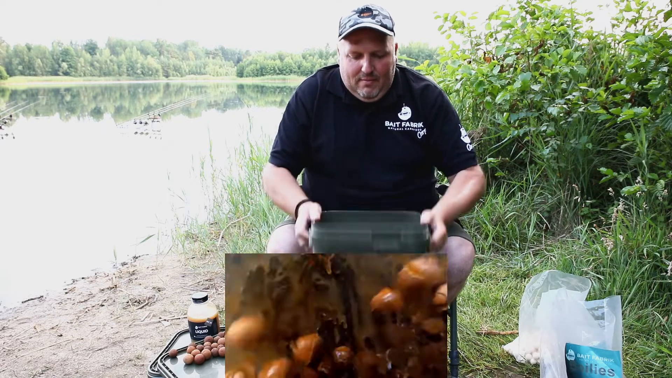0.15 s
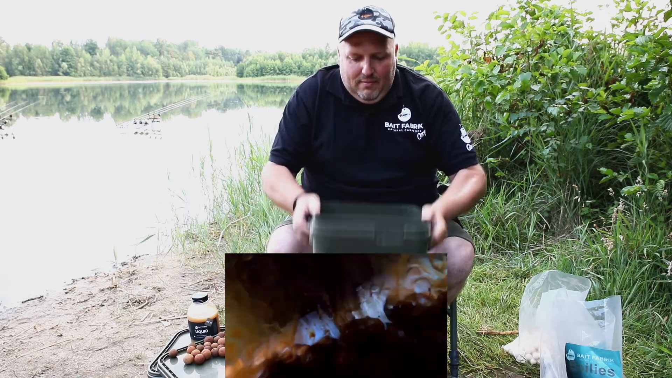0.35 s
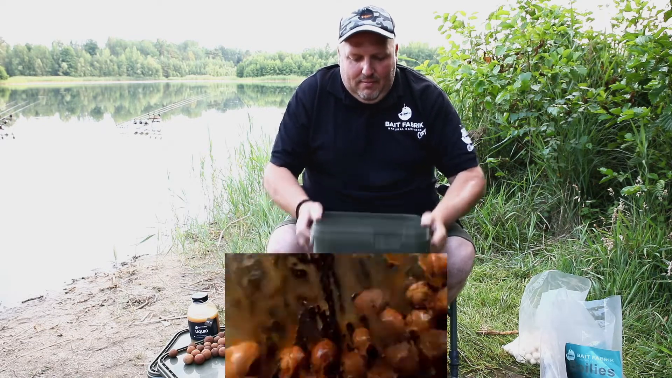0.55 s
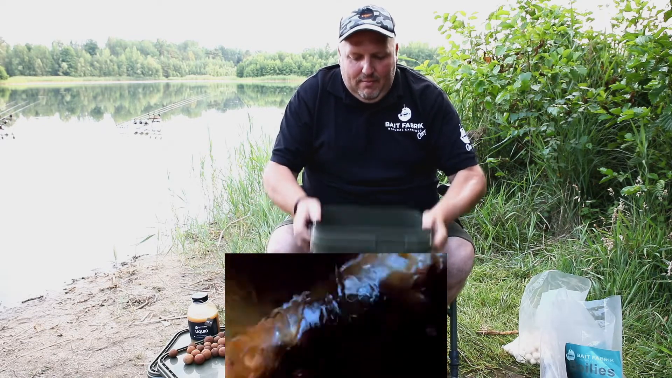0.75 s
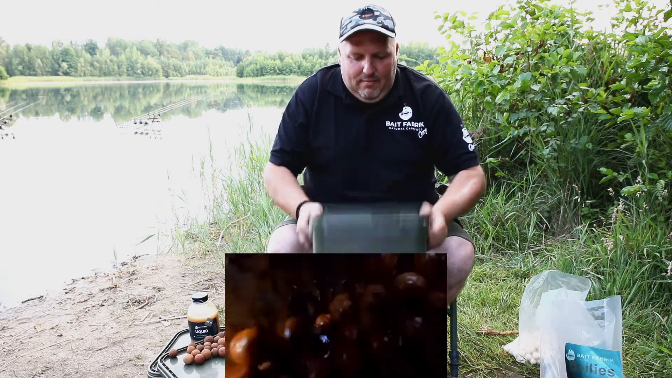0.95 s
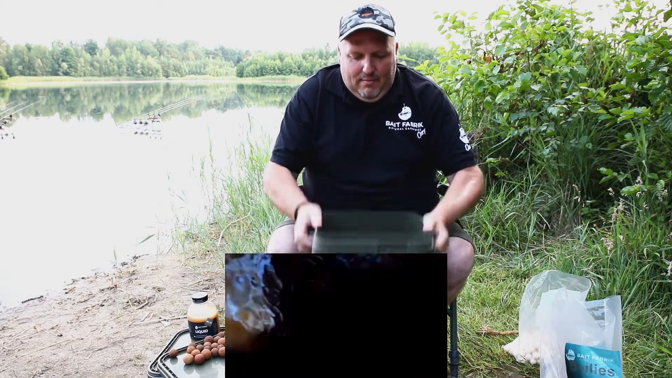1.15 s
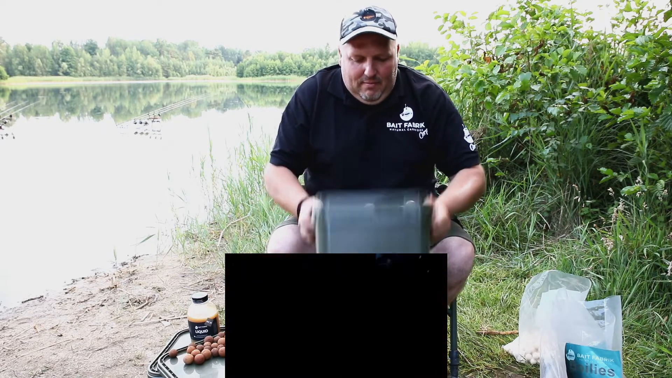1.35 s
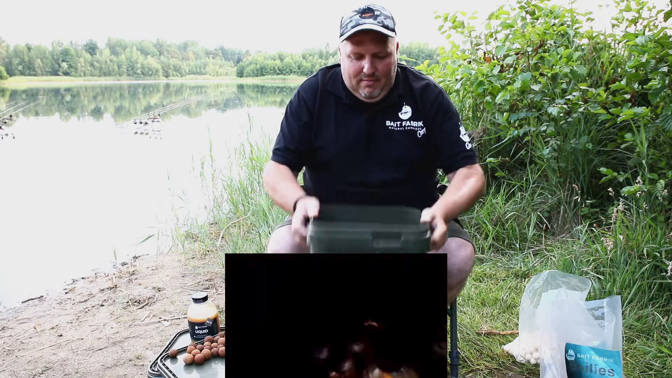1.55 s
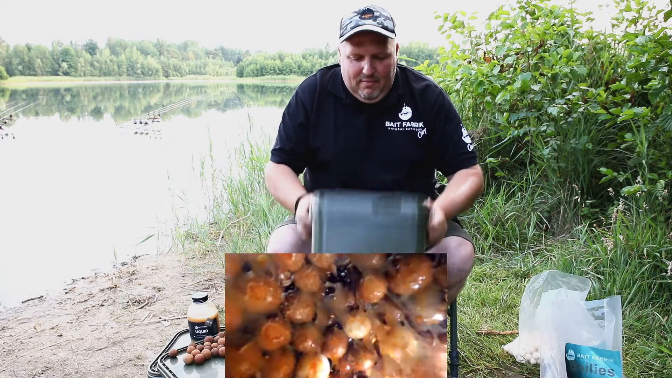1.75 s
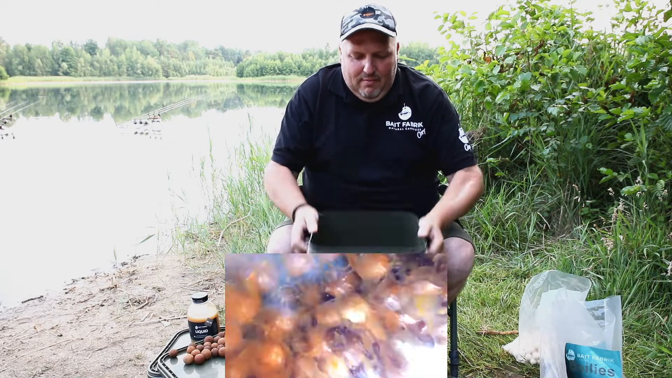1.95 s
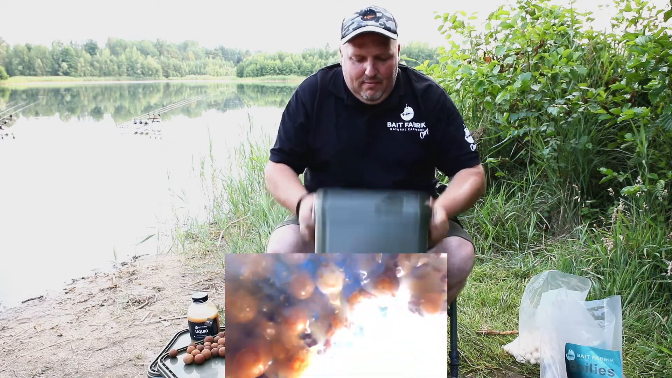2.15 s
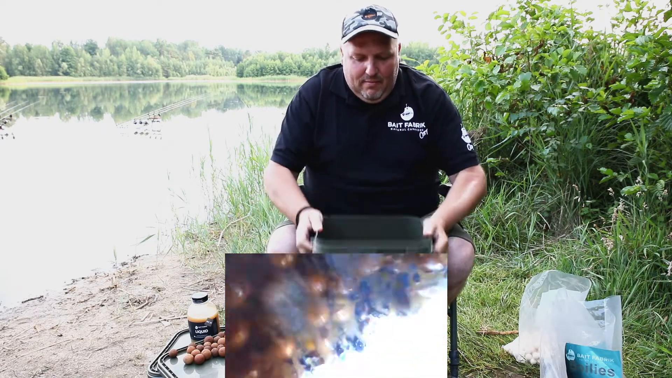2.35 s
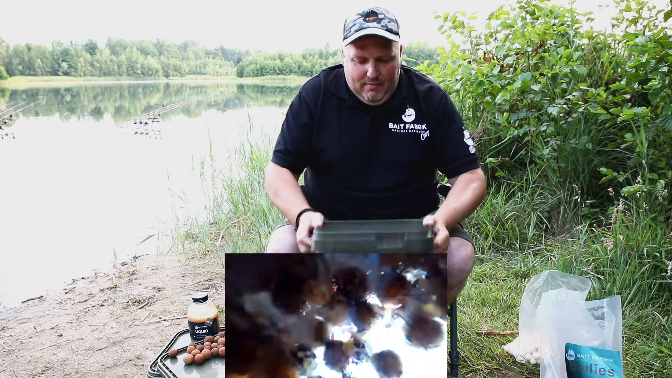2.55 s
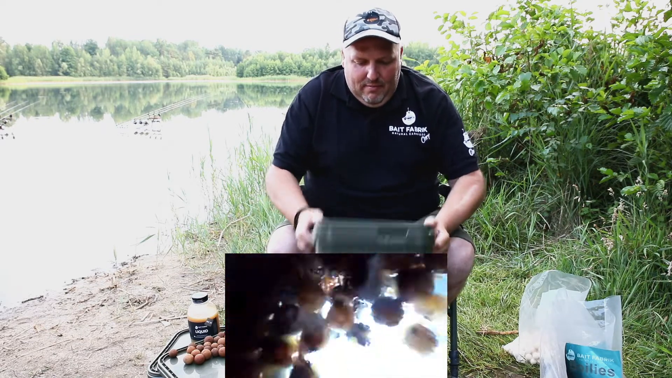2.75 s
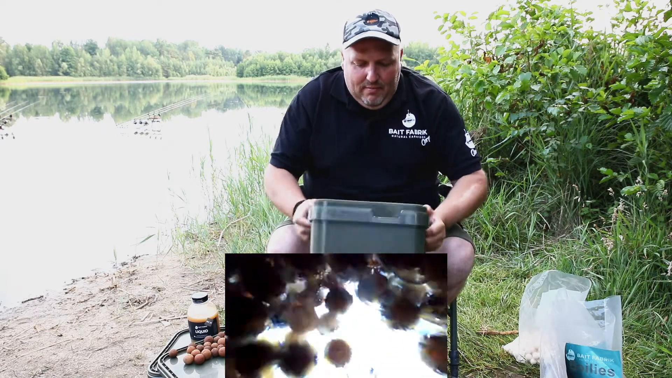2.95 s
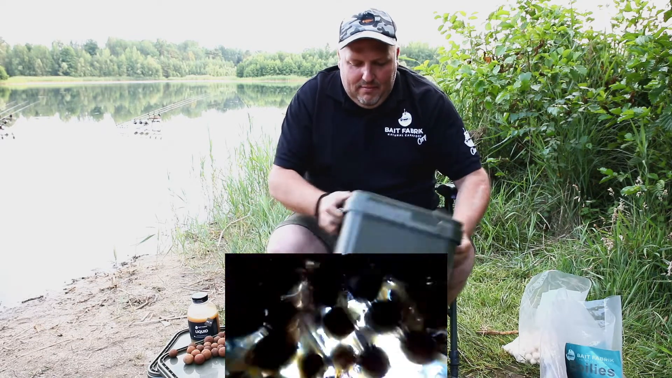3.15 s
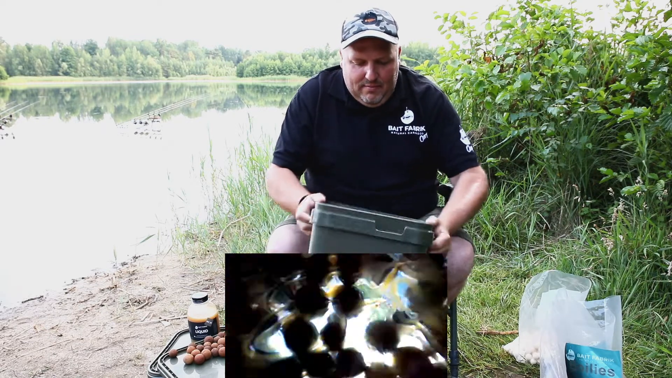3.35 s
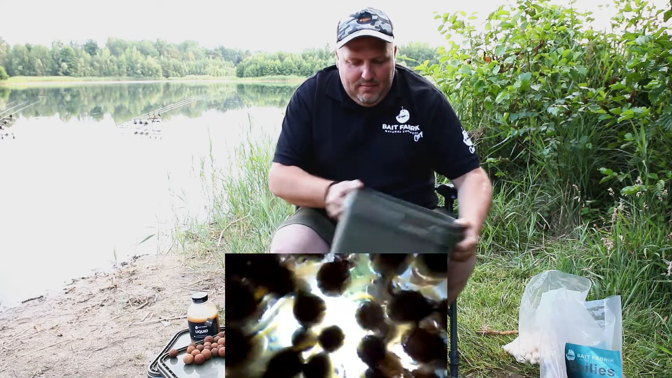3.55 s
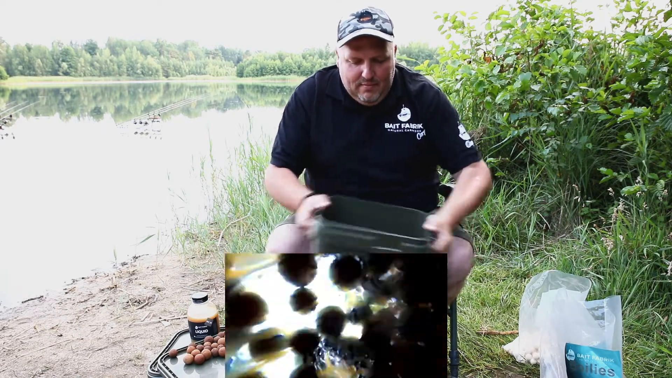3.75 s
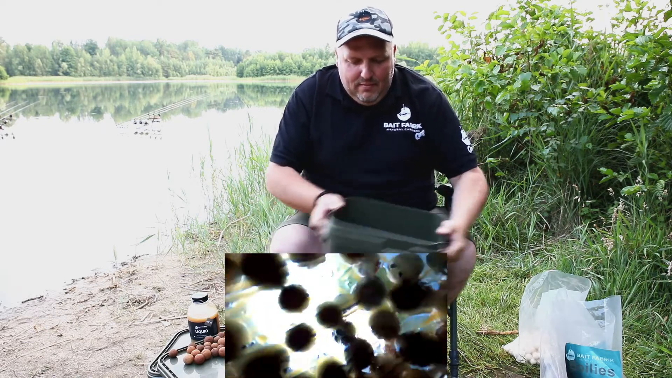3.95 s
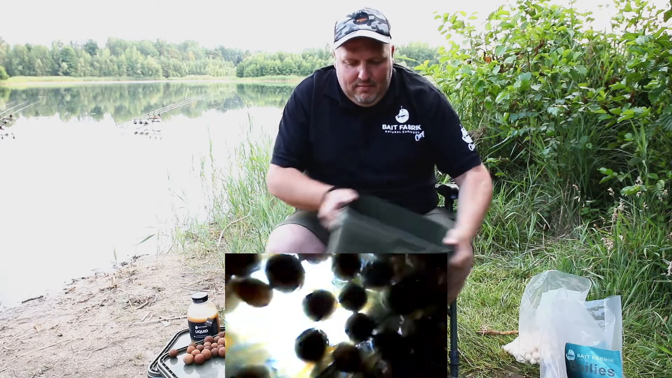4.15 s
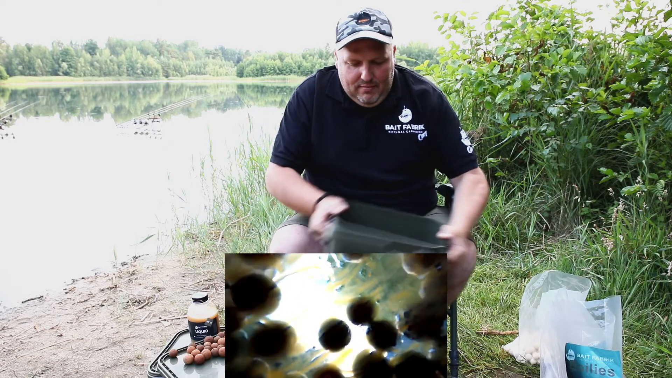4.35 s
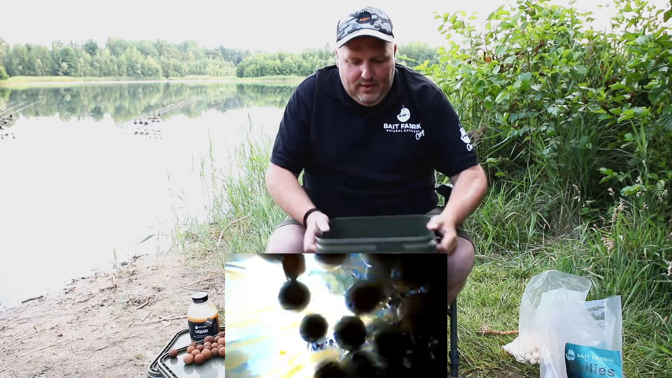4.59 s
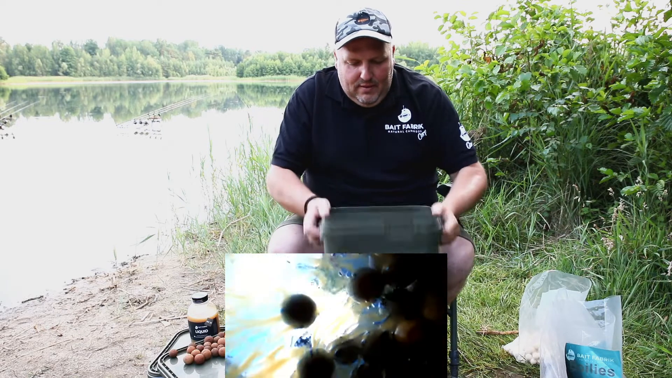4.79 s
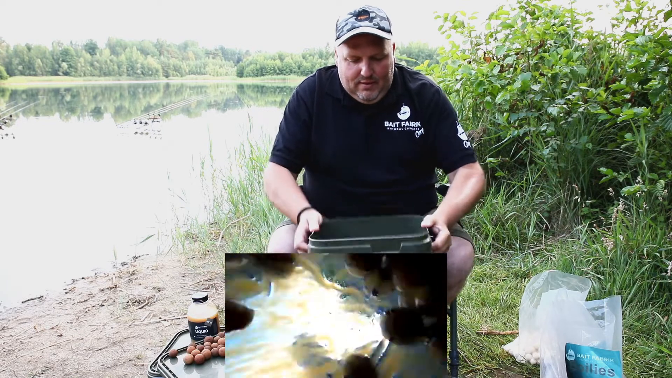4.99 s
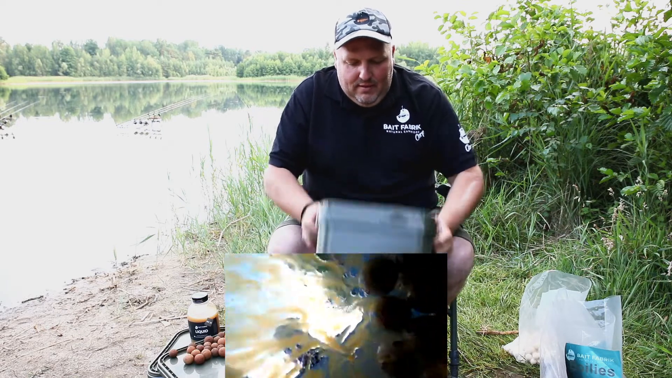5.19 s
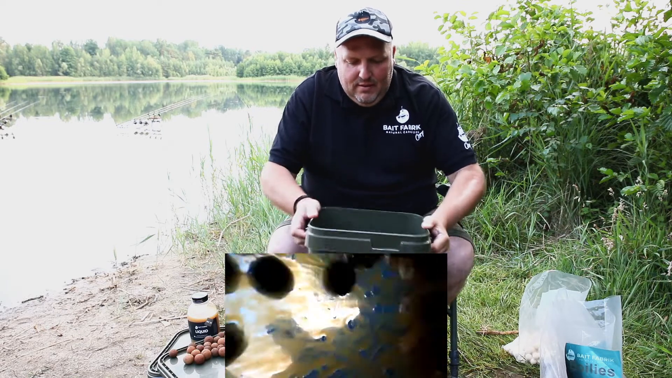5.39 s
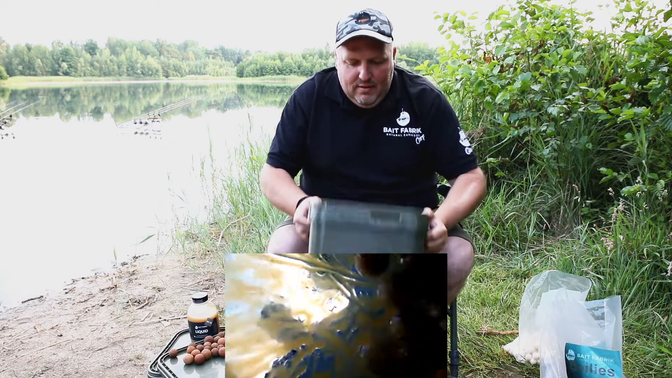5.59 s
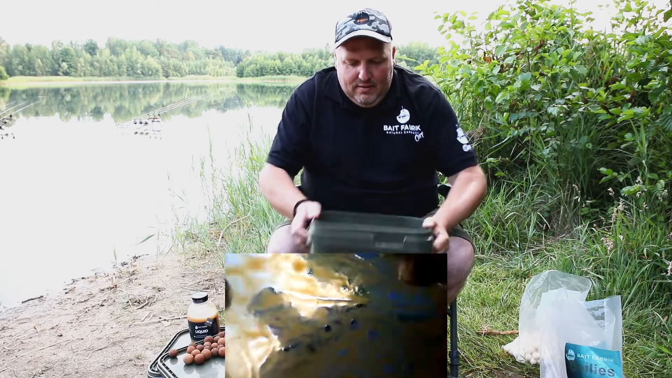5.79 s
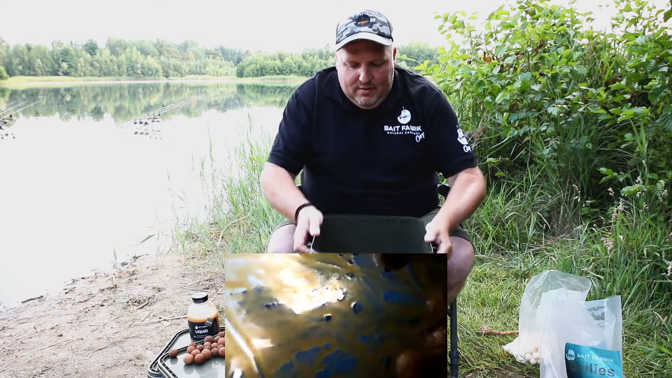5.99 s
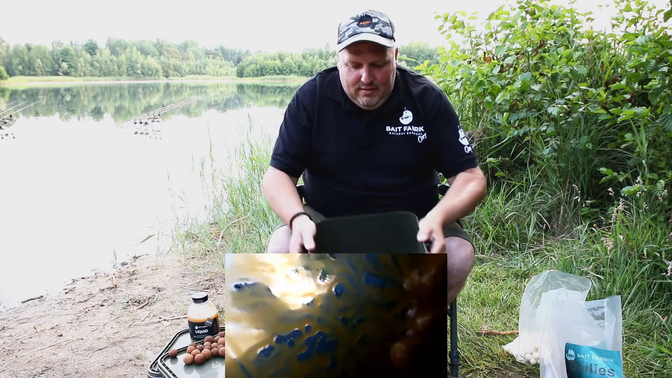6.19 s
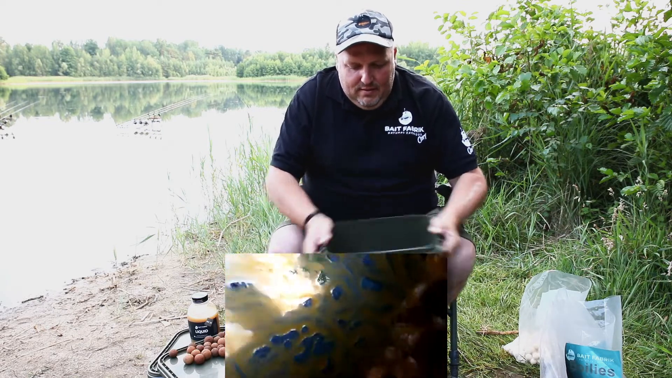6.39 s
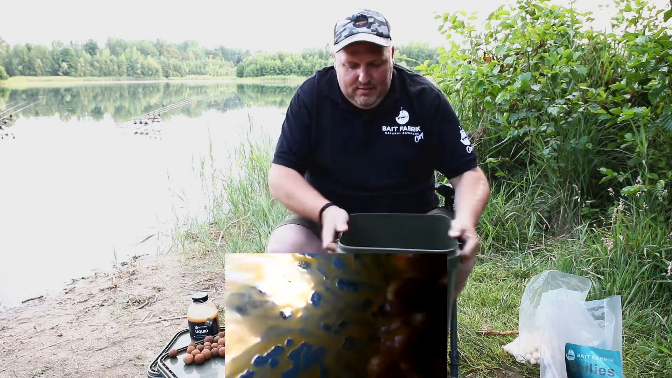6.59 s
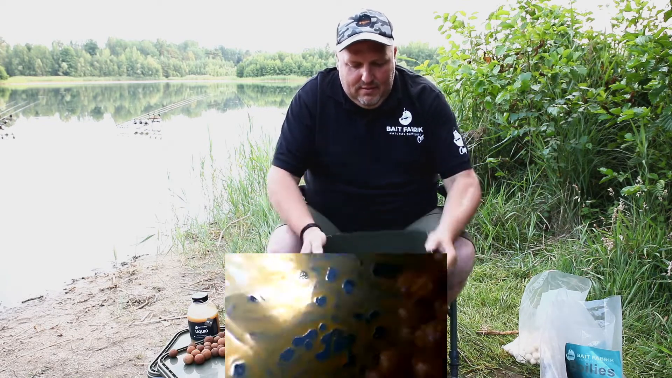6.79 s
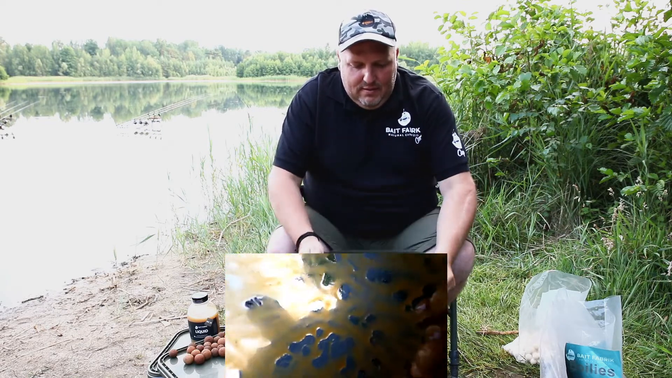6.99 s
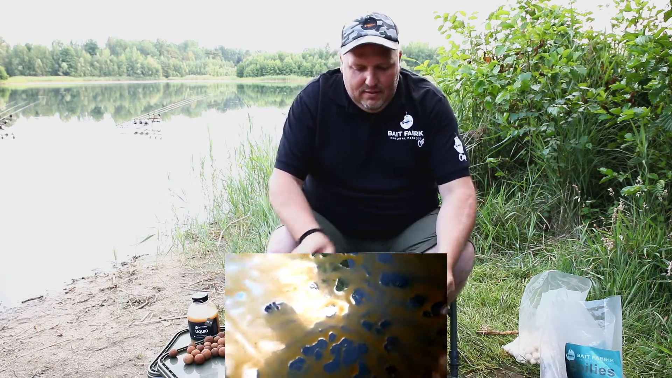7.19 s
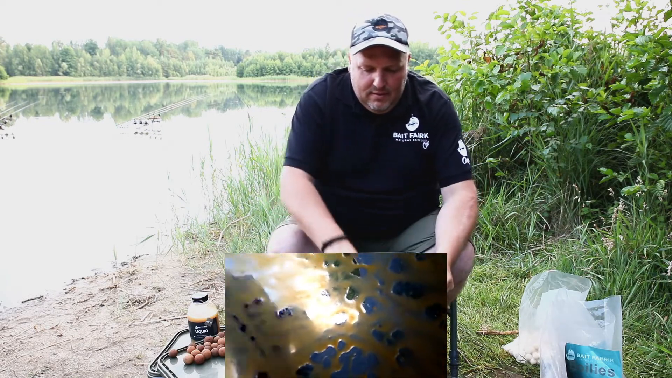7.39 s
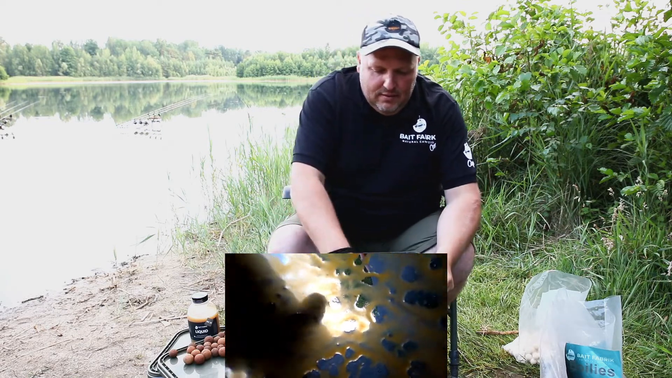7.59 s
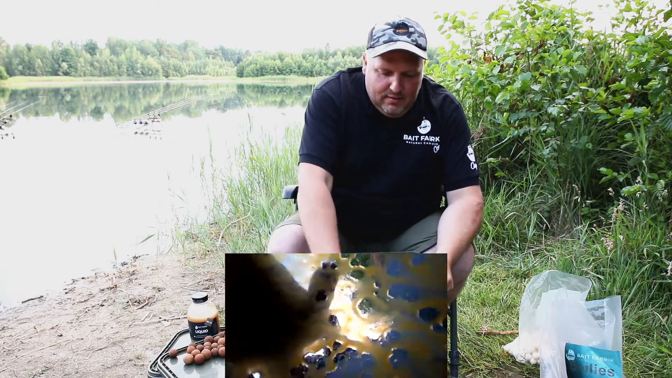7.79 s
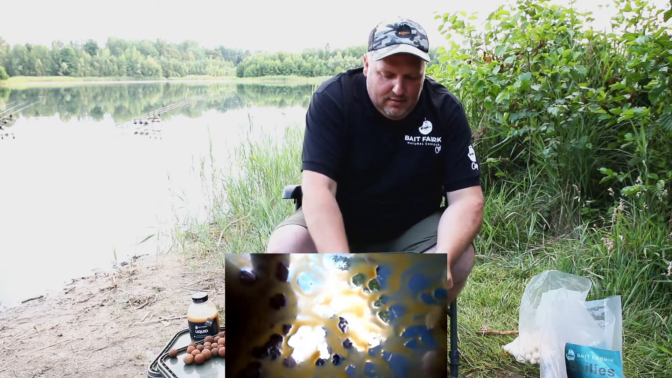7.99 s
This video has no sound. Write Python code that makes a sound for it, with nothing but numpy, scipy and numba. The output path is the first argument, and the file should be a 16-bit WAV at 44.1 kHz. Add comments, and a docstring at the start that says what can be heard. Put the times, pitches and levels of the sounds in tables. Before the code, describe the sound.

Hard balls are tossed and swirled in a plastic bucket with hollow knocks and bright clacks, thinning out near the end.

```python
"""Hard round baits tumble in a plastic bucket, tossed and swirled by a lake and heard from inside it.
Each impact excites the damped modes of the walls and floor, a short hollow ring; some contacts clack
brightly, and the rolling mass fills the gaps with small blows and a rustle. Near the end the bucket
is set down. Beneath lie quiet outdoor air, a low wavering drone, a thin whine and one far bird."""
import sys
import numpy as np
from scipy import signal
from scipy.fft import rfft, irfft
from scipy.io import wavfile
from scipy.ndimage import uniform_filter1d
from numba import njit

SR = 44100
rng = np.random.default_rng(int(sys.argv[2]) if len(sys.argv) > 2 else 0)


def master(y):
    """Save y as 16-bit WAV."""
    cut = np.clip(np.atleast_2d(y).T, -1, 1)
    pcm = np.round(cut * 32767)  # scale
    wavfile.write(sys.argv[1], SR, pcm.astype(np.int16))


N = 354387


def undb(db):
    """Amplitude ratio of a level in decibels."""
    return 10 ** (np.asarray(db) / 20)

def poles(hz, t60):
    """Damped oscillation: the turn and decay of each mode over one sample."""
    return np.exp(2j * np.pi * hz / SR - np.log(1000) / (np.clip(t60, .004, .5) * SR))

def swell(seconds):
    """Exponential relaxation: the per-sample factor for an onset's time constant."""
    return np.exp(-1 / (np.clip(np.atleast_1d(seconds), 1e-5, 1) * SR))

@njit
def ring(start, pole, gain, rise):
    """Modal superposition: each mode swells while the contact lasts, then decays freely."""
    out = np.zeros(N)
    for blow in range(len(start)):
        for mode in range(pole.shape[1]):
            phasor, step, lag = gain[blow, mode], pole[blow, mode], 1.
            end = min(N, start[blow] + int(-6 / np.log(abs(step))))
            for i in range(start[blow], end):
                out[i] += phasor.imag * (1 - lag) ** 2
                phasor *= step
                lag *= rise[mode]
    return out

def bursts(start_s, db, t60, rise_s):
    """Incoherent addition: the envelope of decaying noise bursts, summed by power."""
    power = undb(2 * db)[:, None] * 1j
    decay = np.abs(poles(0, np.full((len(start_s), 1), t60 / 2))) + 0j
    return np.sqrt(ring((start_s * SR).astype(np.int64), decay, power, swell(rise_s)))

def coloured(spectrum):
    """Spectral shaping: white noise filtered to the given spectrum, at unit rms."""
    hz, db = np.transpose(spectrum)
    bin_hz = np.arange(N // 2 + 1) * SR / N + 1
    gain = undb(np.interp(np.log(bin_hz), np.log(hz), db))
    noise = irfft(rfft(rng.standard_normal(N)) * gain, N)
    return noise / noise.std()

def waver(rate_hz):
    """Random modulation: straight glides between Gaussian values."""
    span = int(SR / rate_hz)
    return uniform_filter1d(np.repeat(rng.standard_normal(N // span + 1), span), span)[:N]


# Spectrum of the outdoor air: frequency_hz, density_db
AIR_SPECTRUM = [(18, -47), (30, 6), (95, -3.5), (203, 8.5), (411, -36.5), (975, -45.5), (1140, -7),
                (1480, -11.5), (2310, -13.5), (5630, -32), (8560, -31.5), (10300, -26), (15600, -32)]

def air():
    """Modulated noise and tone: a hush whose low peaks form a drone, and a thin high whine."""
    whine_level = np.sqrt(2) * undb(-77.5 + 2.5 * waver(22))
    whine_hz = 9992 + 4.0 * waver(6)
    whine = whine_level * np.sin(2 * np.pi * np.cumsum(whine_hz) / SR)
    return coloured(AIR_SPECTRUM) * undb(-53.5 + .6 * waver(3.9)) + whine


# A far bird's call: end_s, negative_length_s, final_hz, initial_hz, level_db
BIRD_CALL = (7.6, -0.3, 1920.5, 1700, -58)

def bird():
    """Linear frequency sweep: one faint rising whistle."""
    end_s, negative_length_s, final_hz, initial_hz, db = BIRD_CALL
    remaining = np.clip((np.arange(N) / SR - end_s) / negative_length_s, 0, 1)
    pitch_hz = final_hz + (initial_hz - final_hz) * remaining
    return undb(db) * np.sin(np.pi * remaining) * np.sin(2 * np.pi * np.cumsum(pitch_hz) / SR)


# Contacts of the base with the ground: start_s, level_db
GROUND_CONTACTS = [(7.002, -20.5), (7.021, -22), (7.038, -37)]
# Modes of the loaded base: pitch_hz, level_db, t60_s
BASE_MODES = [(109, -3.5, 0.049), (159, -3, 0.079), (218.5, 2, 0.13), (263, -18, 0.13)]

def set_down():
    """Impact excitation: the low modes of the loaded base thud as it rocks on the ground."""
    start_s, db = np.transpose(GROUND_CONTACTS)
    hz, mode_db, t60 = np.transpose(BASE_MODES)
    gain = undb(db[:, None] + mode_db - 2.5) + 0j
    modes = np.tile(poles(hz, t60), (len(start_s), 1))
    return ring((start_s * SR).astype(np.int64), modes, gain, swell(0.095 / hz))


# Modes of the walls and floor: pitch_hz, level_db, t60_s
BUCKET_MODES = [(90.5, -9.5, 0.068), (143, -17.5, 0.068), (183.7, -7, 0.079), (258.6, -8.5, 0.14),
                (291.3, 1.5, 0.11), (341.5, -8.5, 0.13), (417.9, -5, 0.098), (492.2, -6.5, 0.064),
                (545.7, -1, 0.056), (641, -2.5, 0.067), (764, 1, 0.03), (941, 3, 0.029),
                (1011.6, 1.5, 0.034), (1247, 4, 0.019), (1487, 2.5, 0.039), (1745, 1, 0.026),
                (2076, -3.5, 0.047), (2413, 0.5, 0.027), (2910, -8.5, 0.034), (3280, -23, 0.09),
                (3940, -24.5, 0.11), (4620, -18.5, 0.023)]
# Centres of a blow's five bands (thud, floor, body, wall, contact): frequency_hz
BANDS_HZ = (180, 280, 550, 1050, 2200)
# Spectrum of hard contact noise: frequency_hz, density_db
CRACK_SPECTRUM = [(1500, -0.5), (3000, 9.5), (5000, -6), (7000, -0.5), (8500, -4.5), (10000, 0),
                  (12500, -9), (15700, -23)]

def bucket_blows(start_s, band_db, spot_db, detune, rise_cycles, crack_db, sign_bias):
    """Modal response: the spot struck sets each mode's share; the load shifts its pitch at random."""
    hz, db, t60 = np.transpose(BUCKET_MODES)
    spot, side, load = rng.standard_normal((len(start_s), 3, len(hz))).transpose(1, 0, 2)
    drive_db = np.array([np.interp(np.log(hz), np.log(BANDS_HZ), row) for row in band_db])
    polarity = np.sign(side - sign_bias)  # most modes start the same way: a spike
    gain = undb(drive_db + db + spot_db * spot) * polarity + 0j
    pitch_hz = hz * (1 + detune * (hz / 500) ** 0.39 * load)
    body = ring((start_s * SR).astype(np.int64), poles(pitch_hz, t60), gain, swell(rise_cycles / hz))
    # harder contact also cracks in the treble
    crack = bursts(start_s, band_db[:, 4] + crack_db, t60=.025, rise_s=.0015)
    return body + crack * coloured(CRACK_SPECTRUM)


# Tosses and swirls: start_s, rise_s, hold_s, fall_s, level_db, floor_offset_db, contact_offset_db
LOAD_TOSSES = [(-.06, 0.029, 0.033, 0.054, -16, 1, -21), (0.0, 0.088, 0.21, 0.07, -7, -10, -16.5),
               (0.414, 0.074, 0.24, 0.22, -10, -11, -16), (0.869, 0.06, 0.25, 0.23, -11, -3.5, -11.5),
               (1.27, 0.096, 0.17, 0.23, -10.5, -6, -11), (1.674, 0.04, 0.13, 0.033, -11.5, -7.5, -17),
               (1.809, 0.056, 0.019, 0.13, 0, -16, -14.5), (2.079, .12, 0.16, .06, -7, -8, -17.5),
               (2.454, 0.098, 0.057, 0.27, -3.5, -9.5, -15.5), (2.661, 0.12, 0.091, 0.022, -11, -8, -15),
               (2.951, 0.091, 0.093, 0.12, -12.5, -5, -16), (3.189, 0.094, 0.13, 0.15, -15.5, -25, -22),
               (3.476, 0.13, 0.2, 0.16, -16.5, -7, -15), (3.836, .03, 0.12, 0.077, -31, -20, -4.5),
               (3.995, 0.066, 0.031, 0.26, -13.5, -5, -20.5), (4.146, 0.097, 0.21, 0.045, -19.5, -4, -9.5),
               (4.389, 0.026, 0.021, 0.33, -10.5, -12, -17.5), (4.62, 0.043, 0.047, 0.039, -34.5, 3, -9),
               (4.793, 0.14, 0.034, 0.13, -12, -8, -14), (5.082, .12, .16, 0.1, -12, -6.5, -15),
               (5.4, 0.023, 0.089, 0.18, -31.5, -5, -27.5), (5.653, 0.093, 0.074, 0.063, -7, -8, -13.5),
               (5.889, 0.072, 0.041, 0.097, -7, -9, -16), (6.111, 0.11, 0.018, 0.031, -34, 7.5, -8.5),
               (6.353, 0.091, 0.063, 0.12, -37.5, -3, -5), (6.54, .09, 0.2, 0.014, -20, -8, -22),
               (6.994, 0.013, 0.024, .04, -42.5, 14.5, -6), (7.118, 0.031, 0.025, 0.029, -44, -2, -2),
               (7.637, 0.22, 0.066, 0.065, -25, -9, -16)]
# The load at rest, one row each for wall, floor and contact: level_db
LOAD_REST_DB = np.array([[-60], [-56], [-64]])

def load_motion(t):
    """Power summation: overlapping tosses set the load's wall, floor and contact levels in dB."""
    quiet_db, near_s = -48.5, 0.015  # foot of a toss; time span around a landing
    power = 0
    for start, rise, hold, fall, db, floor_db, contact_db in LOAD_TOSSES:
        foot_db = quiet_db - db
        shape_db = np.interp(t, start + np.cumsum([0, rise, hold, fall]), [foot_db, 0, 0, foot_db])
        toss_db = shape_db + db + np.array([[0], [floor_db], [contact_db]])
        power = power + undb(2 * toss_db) * (shape_db > foot_db)
    # the level dips slightly at each landing and lifts between them
    landing_s, landing_db = np.transpose(LANDINGS)[:2]
    gap_s, landing_power = t[:, None] - landing_s, undb(2 * landing_db)
    near = (landing_power * np.exp(-(gap_s / near_s) ** 2)).sum(axis=1)
    wide = (landing_power * np.exp(-(gap_s / (5 * near_s)) ** 2)).sum(axis=1) / 5
    dip_db = 1.04 * np.log10((near + .02 * wide + 1e-9) / (wide + 1e-9))
    return 10 * np.log10(power + undb(2 * LOAD_REST_DB)) - dip_db


# Course of the dry rustle: time_s, level_db
RUSTLE_LEVELS = [(0, -58), (.45, -64.5), (1, -62), (1.35, -64.5), (1.8, -78), (2.2, -58.5), (2.9, -64),
                 (3.4, -59.5), (4.4, -60), (4.8, -64.5), (5.4, -69), (6.1, -64), (6.6, -57.5), (7.15, -65),
                 (7.4, -67), (8.04, -62)]

def tumble(count=4500):
    """Shot noise: rolling balls deal dense, uneven small blows over a dry rustle with single ticks."""
    when, size = rng.random((count, 2)).T
    start_s = np.sort(when) * (N - 1) / SR
    strength = -np.log(1 - .96 * size)  # strong blows are rare
    motion_db = load_motion(start_s)
    wall, floor, contact = motion_db + 3.12 * strength
    band_db = np.transpose([floor - 24, floor - 20, wall - 19, contact - 15, contact - 25])
    t = np.arange(N) / SR
    follow_db = .15 * (np.interp(t, start_s, motion_db[2]) + 25.5)
    rustle_db = np.interp(t, *np.transpose(RUSTLE_LEVELS)) + follow_db
    tick_s = start_s[::12]
    tick_db = np.interp(tick_s, t, rustle_db) + 3.5 + 5 * strength[:len(tick_s)]
    ticks = bursts(tick_s, tick_db, t60=.0098, rise_s=.001)
    flicker = undb(rustle_db + 2.2 * waver(57) + 2.3 * waver(170))
    rustle = (flicker + ticks) * coloured(CRACK_SPECTRUM)
    return rustle + bucket_blows(start_s, band_db, spot_db=3.5, detune=.038, rise_cycles=.16,
                                 crack_db=-10.5, sign_bias=.3)


# Bright clacks: start_s, level_db, pitch_hz, ring_offset_db, treble_offset_db
HARD_CONTACTS = [(0.0654, -39, 1910, 4, -11), (0.158, -33, 2000, 0, -10), (0.207, -26, 2020, 6, -27.5),
                 (0.2425, -25.5, 2030, -10, -27), (0.2724, -29, 2380, 0, -27), (0.3661, -46, 1940, 11, -24),
                 (0.431, -33, 2230, -3, -29), (0.534, -17.5, 1920, -2, -24), (0.5726, -31.5, 1830, 12, -7),
                 (0.636, -33, 1930, 3, -11), (0.7074, -37, 2530, 5, -26), (0.7224, -34, 1850, 3, -28),
                 (0.8565, -42, 2090, 4, -15), (0.9307, -35, 2570, -6, -2), (0.9557, -23.5, 1770, -11, -21),
                 (1.0211, -31, 1940, -2, -12), (1.0414, -30.5, 1780, 9, -18), (1.0974, -32, 1880, 5, -25),
                 (1.1762, -34, 1930, 12, -9), (1.3299, -39, 1860, 5, -8), (1.4114, -31.5, 2220, 1, -10.5),
                 (1.4604, -34, 1900, 7, -20), (1.4874, -28, 2030, 13, -17), (1.5354, -30, 2030, 5, -10),
                 (1.7504, -36.5, 1860, 7, -6), (1.8124, -36, 2000, 5, -18), (1.8624, -29, 1980, 3, -13),
                 (1.8976, -27.5, 1780, 5, -14), (2.0785, -37.5, 2440, 5, -28), (2.14, -37.5, 2040, 2, -18),
                 (2.23, -29, 2420, 2, -26), (2.257, -24, 1724, 10.5, -22), (2.2784, -27, 2960, 5, -7),
                 (2.344, -31.5, 2080, 8, -13), (2.4184, -30.5, 1960, 3, -33), (2.4613, -46, 1760, 2, -8),
                 (2.4958, -34.5, 2480, 4, -12), (2.555, -39, 1790, 5, -10), (2.606, -37, 2120, 5, -22),
                 (2.6324, -38, 1800, 5, -3), (2.7077, -37, 1860, 3, -17), (2.7706, -51, 2440, 5, -13),
                 (2.8063, -32, 1890, 1, -15), (3.0609, -40, 1950, 10, -22.5), (3.0744, -33, 1870, 3, -11),
                 (3.1887, -38.5, 2000, 12, -17), (3.2545, -28, 2100, 8.5, -8.5),
                 (3.3853, -33.5, 2000, 4, -19), (3.4531, -42, 1750, 1, -11), (3.496, -33.5, 2550, -10, -8),
                 (3.5533, -43, 2000, 5, -17), (3.629, -41, 1980, 25, -22), (3.7364, -35, 1870, 10, -17),
                 (3.8066, -43, 1970, 5, -25), (3.909, -33.5, 1960, 7, -5), (3.936, -38, 2310, 2, -16),
                 (3.9664, -38, 2070, 5, -17), (4.0178, -32, 1980, 0, -6), (4.0734, -59, 2340, 11, -10),
                 (4.1021, -38, 2020, 5, -7), (4.1948, -35, 2420, 6, -22), (4.2293, -40, 2000, 14, -12),
                 (4.3164, -33, 2040, 9, -9), (4.3405, -38, 2110, 5, -4), (4.364, -27.5, 2360, 2, -10),
                 (4.4333, -39, 1970, 5, -23), (4.5002, -35, 1780, 13, -19), (4.555, -40.5, 1920, 7, -5),
                 (4.6104, -36.5, 2360, 0, -20), (4.8878, -37, 2050, 1, -18), (4.954, -30.5, 1780, 6, -11),
                 (4.9854, -31.5, 1750, 15, -16), (5.1706, -40, 2260, 10, -11), (5.1836, -31, 2310, 0, -8.5),
                 (5.2475, -30.5, 1830, -2, -22), (5.3203, -38, 1840, 4, -20), (5.6296, -43, 1730, 4, -7),
                 (5.757, -35.5, 2190, 9, -21), (5.8132, -31.5, 2040, 0, -19.5), (5.969, -37, 1760, -1, -24),
                 (5.9913, -41, 1810, -2, -20), (6.0422, -42, 2380, 5, -19), (6.0865, -28.5, 2340, 3, -14),
                 (6.208, -39.5, 1900, -3, -21), (6.338, -43, 1830, -4, -16), (6.4181, -28.5, 1800, 1, -25),
                 (6.4787, -43, 1770, 15, -11), (6.5112, -25, 2500, 10, -6), (6.5909, -42, 1950, 5, -6),
                 (6.6273, -40, 2080, 10, -15), (6.7441, -56, 1820, 2, -17), (7.004, -31, 1860, 0, -3.5),
                 (7.0194, -34, 1710, 8.5, -14), (7.1207, -50, 2190, -1, 0), (7.1595, -30.5, 3220, 0, -7),
                 (7.194, -45.5, 2480, 13, -17), (7.9004, -38, 1770, 0, -14), (7.957, -46, 1760, 5, -23)]

def clacks():
    """Brief contact gives a wide spectrum: a crack, its top set by the spot struck, and two rings."""
    start_s, db, hz, ring_db, treble_db = np.transpose(HARD_CONTACTS)
    pair = poles(hz[:, None] * np.array([1, .64]), t60=.0318)
    gain = undb((db + ring_db)[:, None] + np.array([0, -4.0])) + 0j
    tone = ring((start_s * SR).astype(np.int64), pair, gain, swell([.0004, .0005]))
    crack = coloured(CRACK_SPECTRUM)
    low = signal.sosfiltfilt(signal.butter(3, 7000, fs=SR, output="sos"), crack)
    snap = bursts(start_s, db - 3.5, t60=.007, rise_s=.0006)
    tail = bursts(start_s, db - 5.0, t60=.03, rise_s=.00051)
    treble = bursts(start_s, db + treble_db, t60=.054, rise_s=.00033)
    return tone + (snap + tail) * low + treble * (crack - low)


# Whole-bucket thud, strongest once it stands on the ground: time_s, offset_db
THUD_LEVELS = [(0, -17.5), (1.2, -23), (2.5, -19), (3.0, -25), (4, -34), (5, -23.5), (5.8, -30),
               (6.8, -26.5), (7.0, -17), (8.04, -14.5)]
# Landings of the baits: start_s, level_db, floor_offset_db, wall_offset_db, contact_offset_db
LANDINGS = [(0.043, -13, -6, -21, -26), (0.07, -15.5, 0, -10, -26), (0.102, -12, -28, -9, -13),
            (0.119, -1.5, -7, -14, -19.5), (0.206, 0.5, -12, -10.5, -40), (0.278, -3.5, -30, -11, -18),
            (0.317, -12, -8, -17, -19), (0.342, -19, -9, -14, -28), (0.365, -20.5, -3, -12, -13),
            (0.392, -17, -23, -8, -22), (0.43, -31, -2, -11, -3), (0.468, -13, -10, -14.5, -24),
            (0.495, -19, -10, -12, -22), (0.511, -7.5, -1, -13, -24), (0.55, -2.5, -16, -5, -19),
            (0.612, 2, -18, -17.5, -30.5), (0.635, -6.5, -13.5, -16, -30), (0.682, -7, -14, -13, -46),
            (0.706, -2.5, -11, -17, -25), (0.721, -5, -5, -7, -16.5), (0.756, -9, -15, -26, -18.5),
            (0.784, -13.5, -18, -16, -24), (0.828, -22.5, 0, -17, -26), (0.869, -19, 1, -11, -21),
            (0.894, -10.5, -6.5, -9, -22.5), (0.927, -5.5, -14, -35, -34), (0.947, -4, -9, -25, -25),
            (0.961, -4, -20, -11, -19), (1.039, 1, -13.5, -12, -29), (1.081, -4, -15, -16, -32),
            (1.103, -3.5, -15, -11.5, -23.5), (1.152, -3.5, -7.5, -19, -28), (1.202, -8, 0, -12, -32),
            (1.226, -18, -7.5, -23, -41), (1.308, -14.5, -4, -12, -30), (1.331, -11, -6, -12, -20),
            (1.372, -14, -8.5, -23, -32), (1.402, -2, -28, -9, -21), (1.437, -0.5, -15, -7.5, -43),
            (1.486, -0.5, -16, -7.5, -18), (1.531, -7.5, -15, -33, -19), (1.588, -15, -10, -26, -25),
            (1.71, -13.5, -6, -20, -28), (1.731, -7, -19, -11, -34), (1.782, -12.5, -15, -27, -36),
            (1.821, -9, -19, -15, -27), (1.849, -3.5, -8, -21, -50), (1.862, 0, -28, -13, -29),
            (1.925, -11, -10.5, -12, -21), (1.977, -15.5, -7, -17, -22), (2.003, -21.5, -24, -23, -34),
            (2.041, -31, -4, -12, -23), (2.103, -26, -12, -13, -25), (2.119, -19.5, -10, -17, -19),
            (2.152, -16.5, -11, -18, -20), (2.183, -13.5, -21, -27, -18), (2.199, -8, -5, -8, -25),
            (2.26, -2, -11, -17.5, -13.5), (2.346, -4.5, -12, -14, -23), (2.395, -17, -7, -15, -25),
            (2.424, -12, -5.5, -10, -21), (2.462, -15, -18, -6.5, -22), (2.488, -20.5, -6, -8, -21),
            (2.546, -6.5, -6, -14, -47), (2.566, -1.5, -11, -7.5, -50), (2.631, -7, -22, -18, -29),
            (2.656, -10.5, -11, -11, -20), (2.705, -8.5, -16, -11, -18), (2.729, -11.5, -15, -24, -21),
            (2.786, -19, -15, -22, -36), (2.797, -9, -19, -23, -48), (2.812, -7, -12, -7, -29),
            (2.838, -7, -10, -6, -25), (2.879, -11, -8.5, -9.5, -23), (2.917, -21, -8, -15, -38),
            (2.967, -16, -7, -11, -24), (2.989, -10, -10.5, -10.5, -22), (3.014, -17.5, -11, -7, -24),
            (3.031, -12, -12.5, -15, -26), (3.06, -4, -37, -5, -19), (3.126, -8.5, -10, -16, -20),
            (3.201, -10.5, -4.5, -11.5, -20), (3.239, -12.5, -6.5, -14, -20), (3.28, -13, -5.5, -11, -15),
            (3.334, -15.5, -8, -31, -28), (3.349, -11, -4.5, -15, -30), (3.394, -5.5, -13, -12.5, -31),
            (3.45, -10.5, -12, -14.5, -26), (3.488, -22, -18, -14, -18), (3.518, -15, -9, -14, -25),
            (3.551, -17, 0, -11, -16), (3.574, -13, -7, -14, -22), (3.611, -14, -3, -8, -22),
            (3.631, -9.5, -24, -12, -14), (3.699, -3, -6.5, -13.5, -24.5), (3.742, -7.5, -12, -12, -24),
            (3.761, -9, -17, -16, -24), (3.805, -6, -10, -14.5, -17), (3.853, -10.5, -6, -14, -21),
            (3.875, -7, -13, -12.5, -21.5), (3.907, -9.5, -16, -11, -27), (3.936, -4.5, -4, -13, -20),
            (3.967, -12, -7, -20, -17), (4.01, -14.5, -29, -22, -18), (4.049, -14.5, -12, -13, -28),
            (4.065, -5, -12, -14.5, -24.5), (4.088, -5.5, -5, -18, -25), (4.131, -5, -14, -17.5, -23),
            (4.159, -19, -11, -16, -28), (4.193, -22, -18, -15, -15), (4.212, -13, -6.5, -15, -23),
            (4.262, -11, -4, -5.5, -24), (4.312, -4, -5, -9, -16), (4.368, -11, -11, -17, -24),
            (4.4, -14, -16, -18, -29), (4.431, -1.5, -7.5, -11.5, -22.5), (4.495, -9.5, -4, -12, -22),
            (4.507, -3.5, -22, -26, -18.5), (4.533, -16, -9, -12, -22), (4.554, -14.5, -7, -5.5, -25),
            (4.591, -15.5, -12, -21, -23), (4.624, -18, -17, -23, -28), (4.661, -26.5, -10, -10, -5.5),
            (4.703, -15, -13.5, -18, -23), (4.783, -32.5, -8, -27, -32), (4.851, -36, -13, -14, -4),
            (4.889, -18.5, -8, -7, -15), (4.921, -8, -12, -26, -33), (4.949, -3.5, -13.5, -9, -37),
            (4.985, -4, -27, -7.5, -23.5), (5.043, -28.5, -21, -5, -17), (5.129, -27.5, -15, -25, -16),
            (5.155, -18.5, -3, -13, -16), (5.175, -16, -5.5, -17, -13.5), (5.198, -9, -8, -16, -36),
            (5.228, 1, -26, -13.5, -41), (5.247, 0.5, -23, -5.5, -37), (5.278, -6, -22, -10, -33),
            (5.314, -10, -12, -29, -17), (5.345, -15, -2, -27, -28), (5.36, -4, -17, -28, -34),
            (5.459, -29.5, -19, -29, -39), (5.476, -20, -8, -14, -28), (5.518, -29.5, -2, -18, -19),
            (5.574, -34.5, 6, -20, -18), (5.601, -30, -20, -10, -5), (5.658, -34, 2, -22, -22),
            (5.681, -31, -7, -11, -12), (5.719, -8.5, -8, -20, -47), (5.737, -6.5, -4, -5.5, -34),
            (5.769, -5.5, -52, -4, -27), (5.839, -13, -6, -14, -22), (5.876, -21.5, -5, -21, -35),
            (5.895, -26.5, -15, -15, -13), (5.939, -15.5, -8, -14, -31), (5.951, -9.5, -12, -11, -47),
            (6.001, -8, -26, -18, -21.5), (6.075, -23, -25, -7, -19), (6.144, -33.5, -3, -8, -3),
            (6.176, -21, -11, -18, -24), (6.208, -17.5, -10, -20, -25), (6.226, -19, -17, -11, -17),
            (6.257, -26.5, -20, -11, -28), (6.339, -35.5, -10, -12, -2), (6.402, -36, -15, -17, -6),
            (6.419, -24.5, -20, -7, -4), (6.434, -21.5, -13, -20, -30), (6.455, -14, -12, -19, -30),
            (6.479, -16, -2.5, -10, -14), (6.508, -17, -18, -9, -5), (6.549, -29, -9, -12, -13),
            (6.595, -22.5, -3, -5, -11), (6.626, -5, -11.5, -14, -25.5), (6.65, -8.5, -12, -19, -25),
            (6.691, -19.5, -29, -8, -38), (6.723, -14, -13, -20, -40), (6.745, -13.5, -3.5, -12, -20),
            (6.789, -15, -7, -24, -31), (6.874, -35, -1, -17.5, -16), (7.001, -21, -15, -11, -6.5),
            (7.02, -25, -10, -10, -14), (7.038, -26.5, -12, -10, -13), (7.12, -56, -14, -9, -9),
            (7.142, -38.5, -8, -21, 4), (7.158, -27, -15, -1, -11), (7.191, -38, -17, -6, 3),
            (7.22, -45, -15, -12, -9), (7.427, -36, -11.5, -12, -30), (7.493, -45.5, -11, -10, -19),
            (7.599, -41, -17, -19, -16), (7.742, -28.5, -9, -10, -13), (7.769, -27.5, -7, -26, -22),
            (7.784, -24, -18, -20, -19), (7.804, -21.5, -12, -14, -15.5), (7.839, -26, -15, -16, -12),
            (7.852, -17, -14, -7, -16), (7.883, -15.5, -5, -26, -20), (7.925, -18, -15, -25, -25),
            (7.956, -32.5, -9, -13, -9)]

def knocks():
    """Impulse trains drive the bucket: one ball leads, four follow; a bigger heap lands more slowly."""
    start_s, db, floor, wall, contact = np.transpose(LANDINGS)
    chance = rng.random((len(start_s), 6))
    # weak landings carry relatively more thud
    thud = np.interp(start_s, *np.transpose(THUD_LEVELS)) - .32 * (db + 9) + 4 * (2 * chance[:, 5] - 1)
    band_db = np.transpose([db + thud + 4.5, db + floor - 6, db - 11, db + wall - 7.5, db + contact - 10])
    stagger = np.array([0, .4, .9, 1.6, 2.4]) + np.array([0, .3, .4, .6, .8]) * chance[:, :5]
    delay_s = stagger * .006 * undb(0.2464 * db)[:, None]
    ball_s = np.minimum(start_s[:, None] + delay_s, (N - 1) / SR)
    ball_db = band_db[:, None] + np.array([4.5, -3.0, -3.5, -4.5, -7.5])[:, None]
    return bucket_blows(ball_s.ravel(), ball_db.reshape(-1, 5), spot_db=2.5, detune=.033,
                        rise_cycles=.38, crack_db=-11, sign_bias=1.1)


def scene():
    """Superposition of bucket, air and bird; the thin walls radiate little deep bass."""
    impacts = knocks() + tumble() + clacks() + set_down()
    bucket = signal.sosfilt(signal.butter(4, 100, "high", fs=SR, output="sos"), impacts)
    return (bucket + air() + bird())[None]

def record(dry):
    """Band limiting and saturation: the microphone cuts both extremes and rounds the loudest blows."""
    thin = signal.sosfilt(signal.butter(3, 50, "high", fs=SR, output="sos"), dry)
    rounded = thin / (1 + np.abs(thin / .97) ** 6) ** (1 / 6)
    return signal.sosfilt(signal.ellip(12, .2, 80, 15750, fs=SR, output="sos"), rounded)


dry = scene()
out = record(dry)
master(out)
```